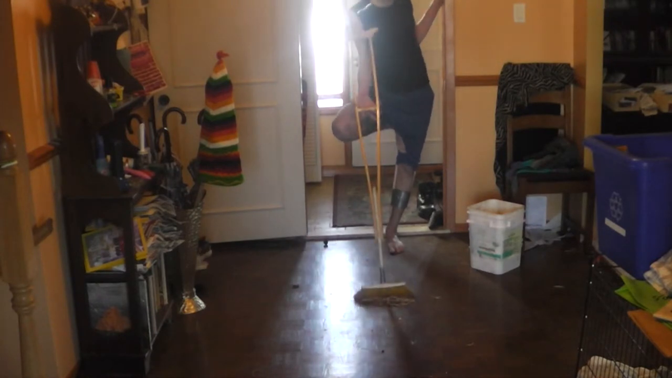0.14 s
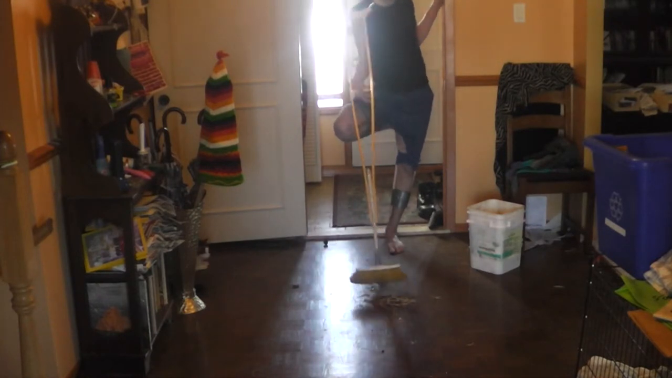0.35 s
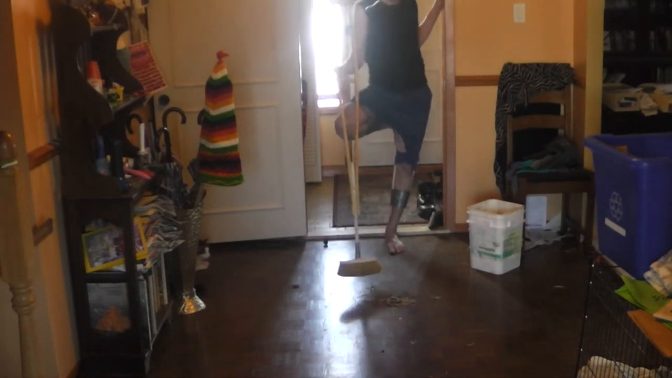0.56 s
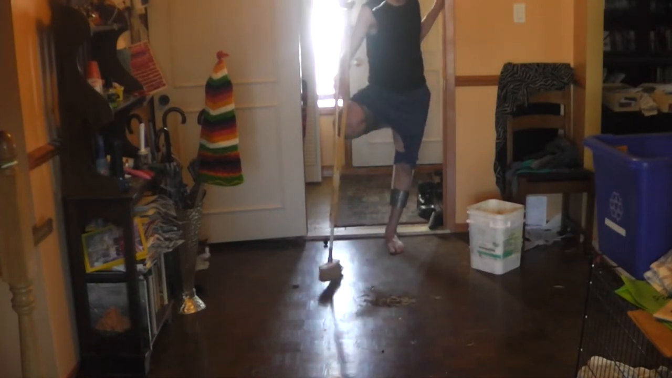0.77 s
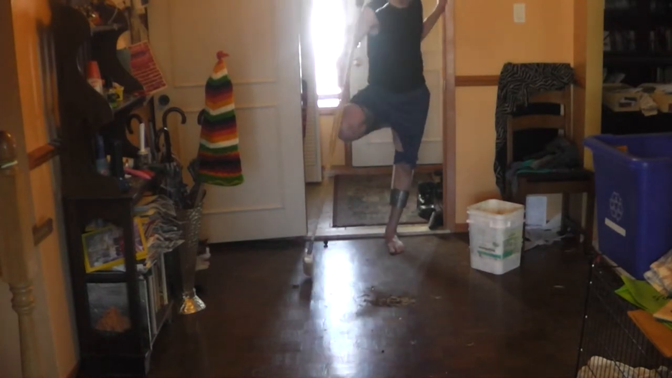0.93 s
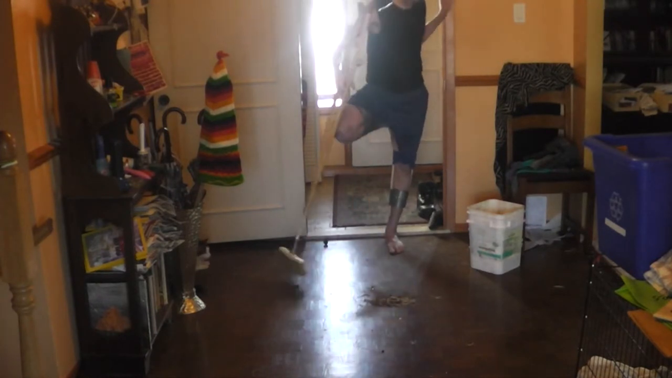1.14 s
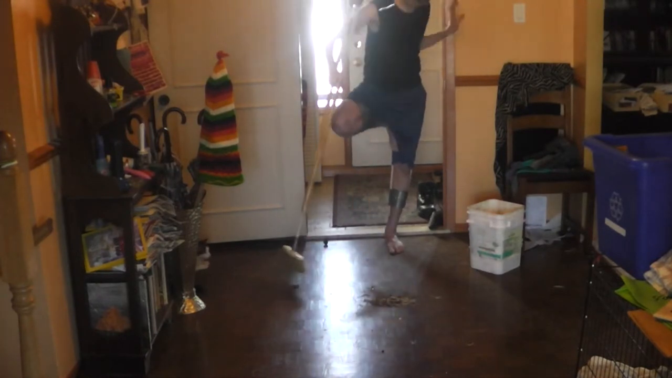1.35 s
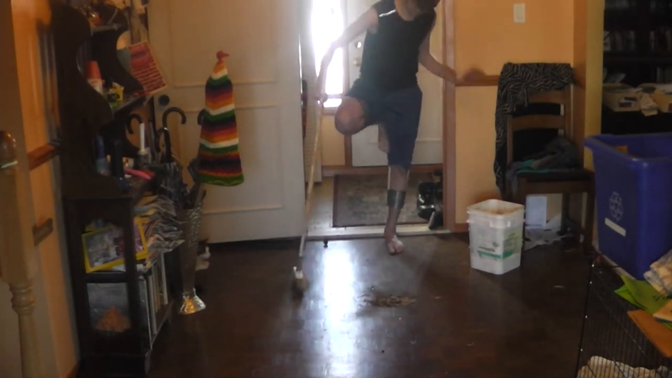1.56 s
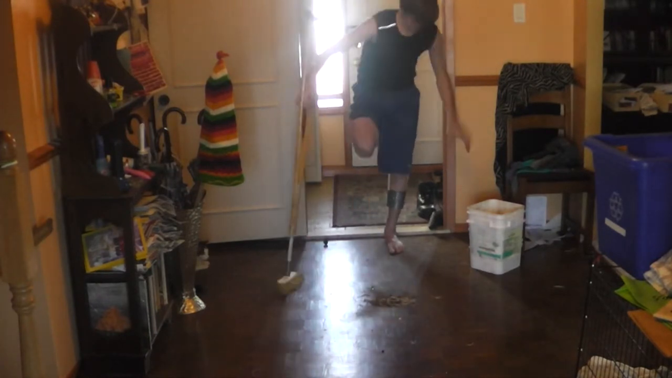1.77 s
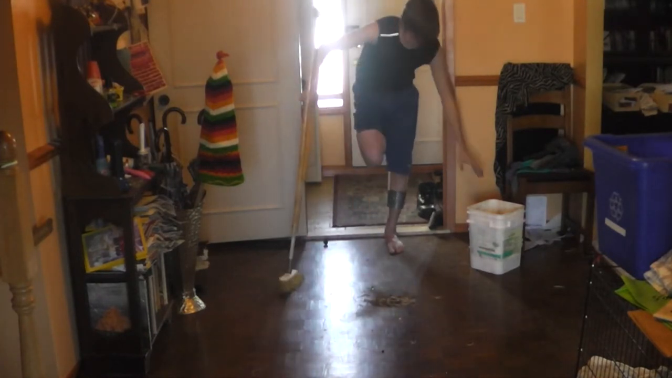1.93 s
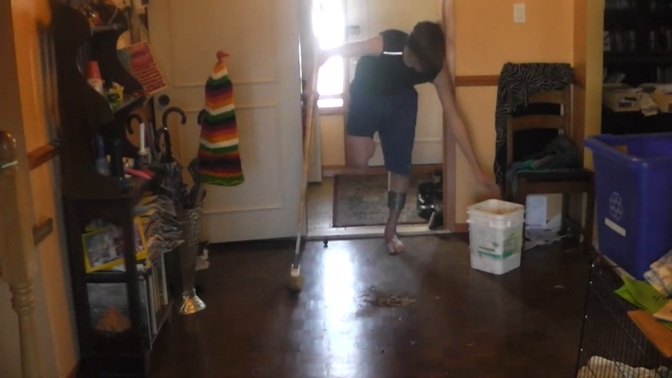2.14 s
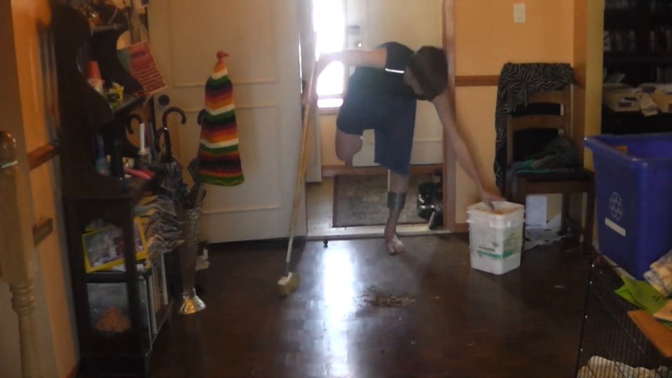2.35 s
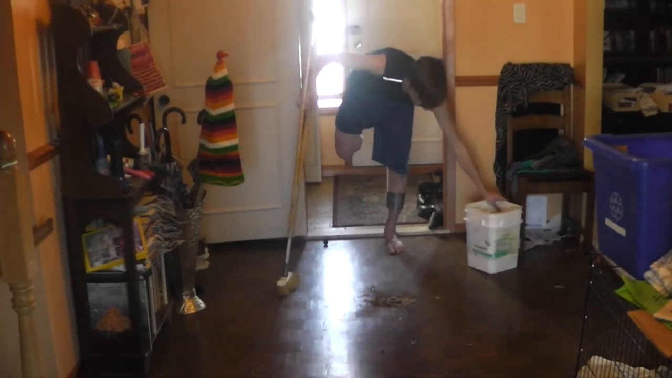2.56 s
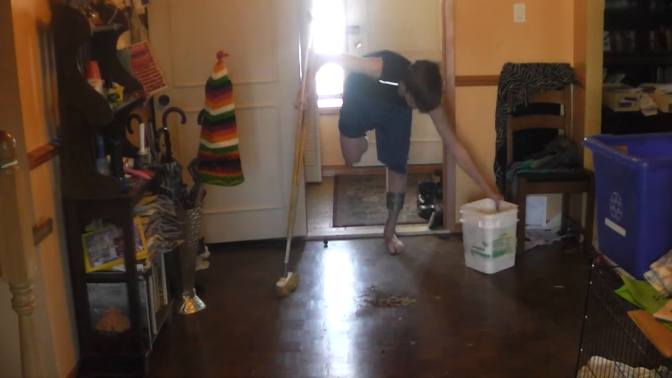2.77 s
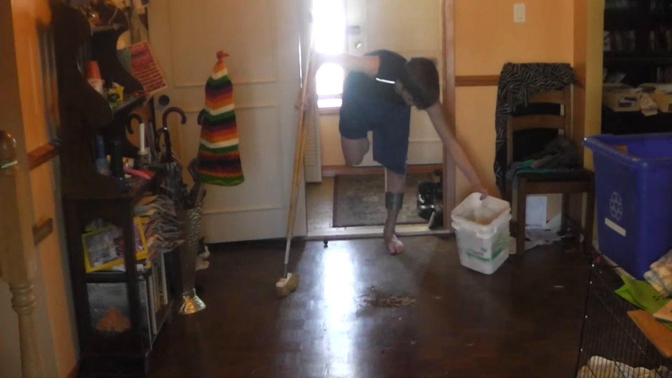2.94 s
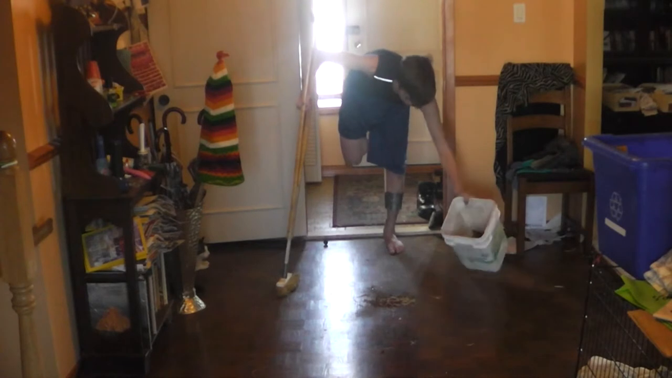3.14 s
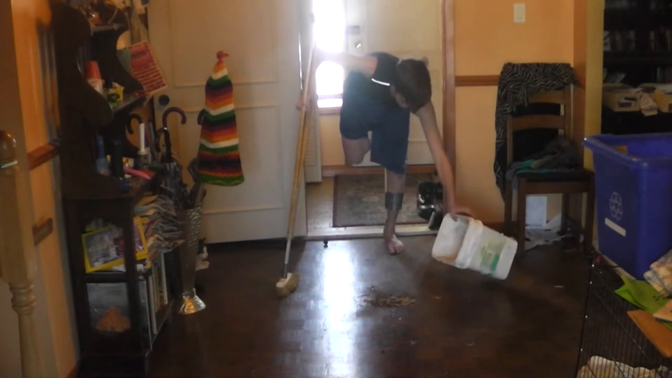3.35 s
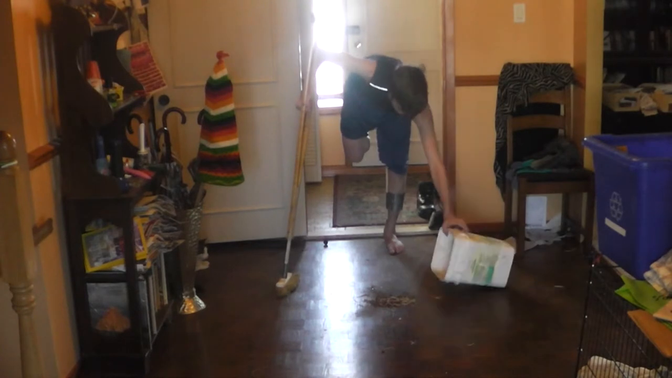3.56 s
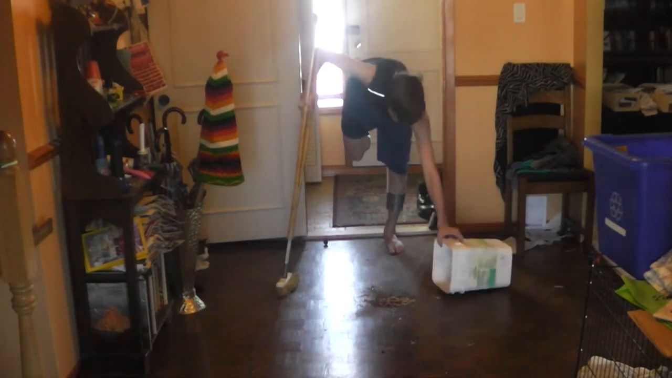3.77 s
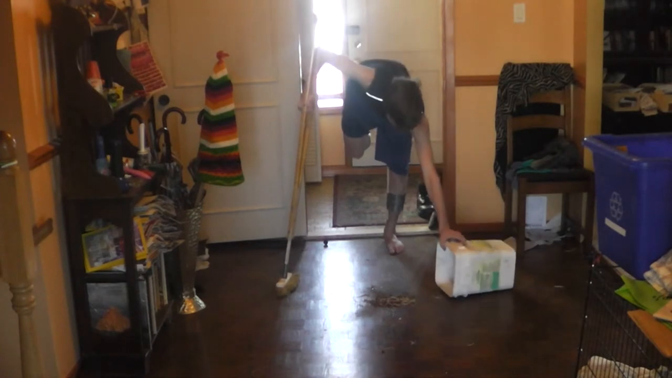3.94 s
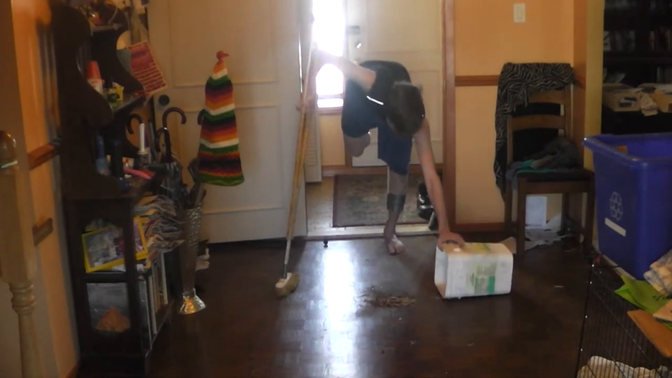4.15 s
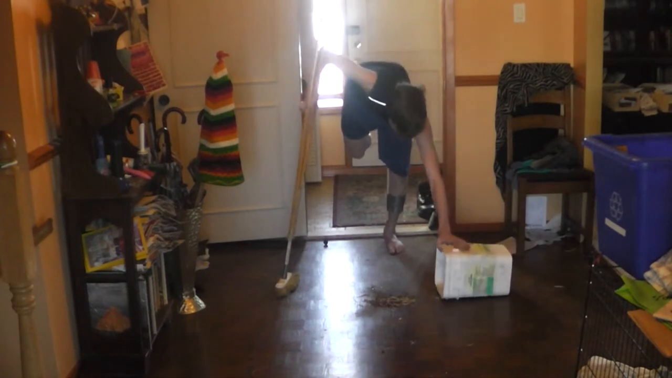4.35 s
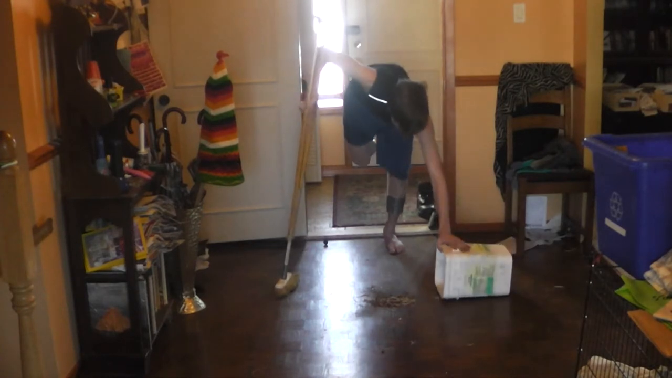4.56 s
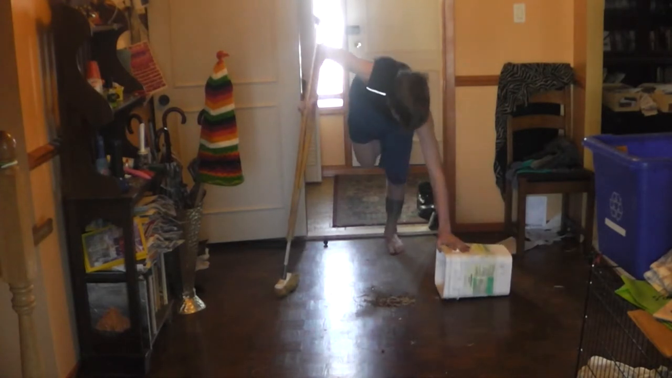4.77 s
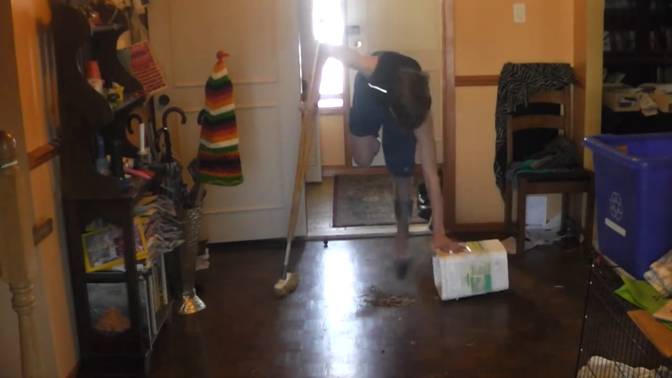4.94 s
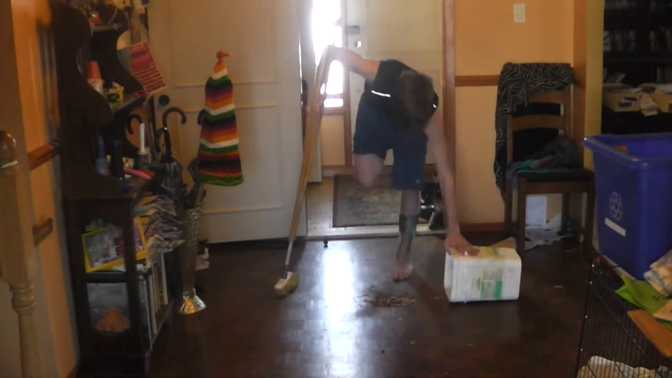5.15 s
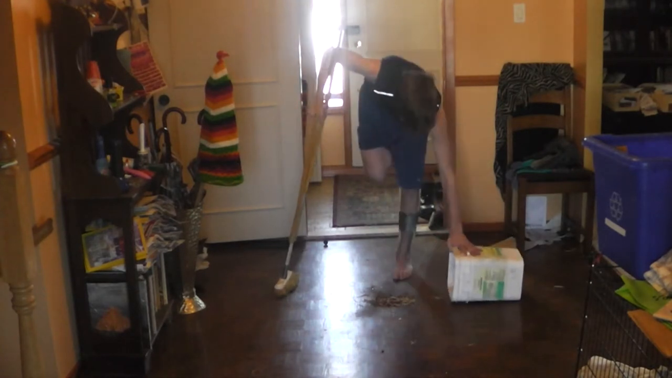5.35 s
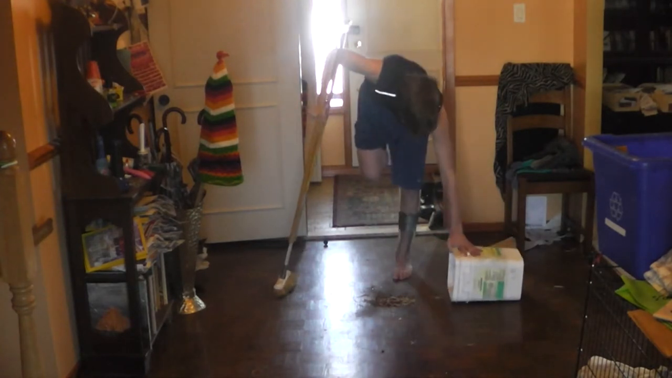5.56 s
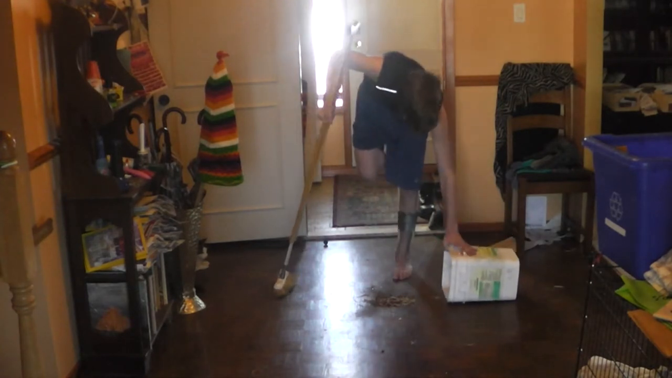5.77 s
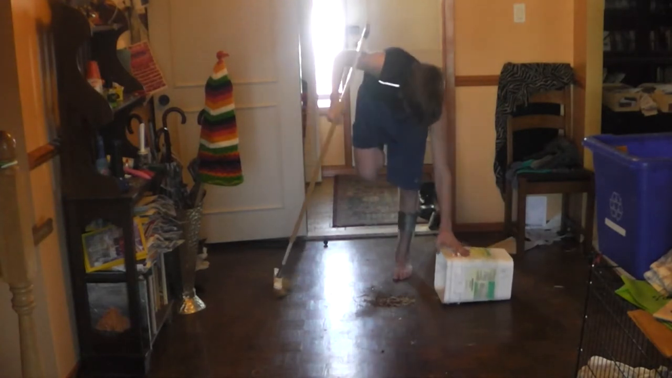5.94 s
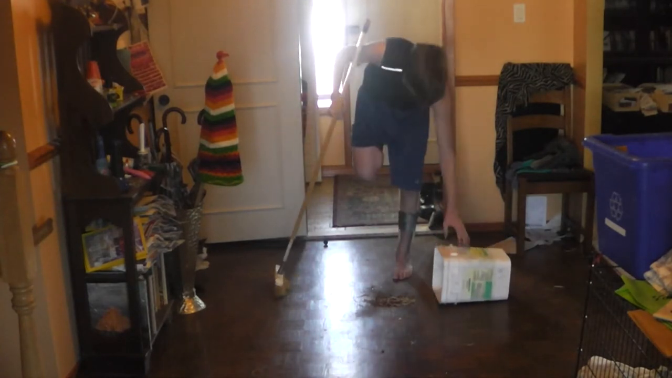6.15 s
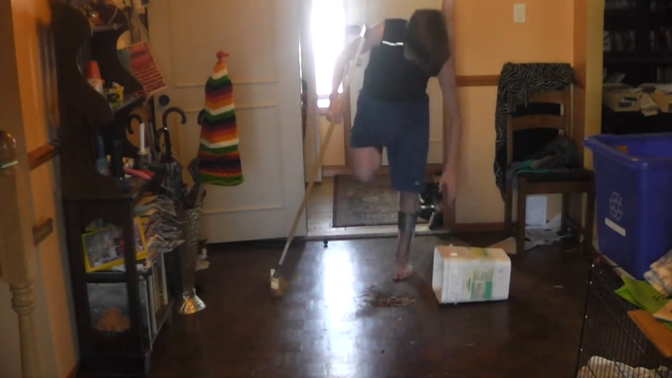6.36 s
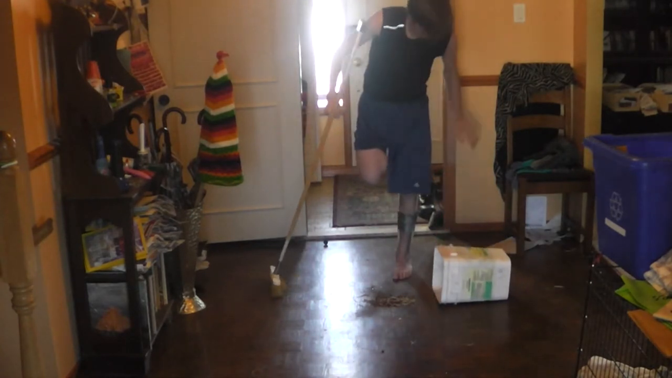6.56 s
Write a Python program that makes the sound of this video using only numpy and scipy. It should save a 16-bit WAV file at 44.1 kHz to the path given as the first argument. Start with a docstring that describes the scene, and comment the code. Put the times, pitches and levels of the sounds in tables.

```python
"""Plastic bucket on a wooden hall floor

A bucket is tipped over, laid down, dragged and dropped into place, and a broom taps: decaying modes plus noise.
Clothes and hands rustle and the bucket's contents rattle with a hiss at the blows (filtered clicks);
faint high pings flutter (modulated tones). An appliance hums (wavering sines) over room noise (filtered noise).
A small stereo microphone hears it from a few metres, with hall reverberation from sparse taps.
"""
import sys
import numpy as np
from scipy import signal
from scipy.fft import rfft, irfft
from scipy.io import wavfile
from scipy.ndimage import uniform_filter1d

SR = 44100
rng = np.random.default_rng(int(sys.argv[2]) if len(sys.argv) > 2 else 0)


def file_out(sig):
    """Save sig as 16-bit WAV at sys.argv[1]."""
    # one column per channel
    cols = np.atleast_2d(sig).T
    # limit, then scale
    lim = np.clip(cols, -1, 1)
    pcm = np.round(lim * 32767).astype(np.int16)
    wavfile.write(sys.argv[1], SR, pcm)


N = 291501

# room noise spectrum: freq_hz, density_db
AIR_SPECTRUM = [(8.8, -42), (15, -12), (64, -4.5), (87, -26), (124, -5.5), (286, -10), (312, -10),
                (350, -12), (589, -14), (643, -15.5), (1490, -28.5), (2160, -42.5), (10300, -43),
                (13000, -50), (15000, -80)]
AIR_DB = -42
# appliance hum partials: freq_hz, rms_db
HUM_PARTIALS = [(59.5, -55.5), (119.6, -43.5), (360, -54)]

# rustles of clothes and hands, and hissing rattle of the bucket's contents at the blows:
# peak_s, rise_s, fall_s, level_db, bright_minus_dull_db
RUSTLES = [(.15, 0.18, 0.072, -51, 5), (.27, 0.033, 0.088, -52, 18), (.51, 0.11, 0.18, -49, 5),
           (.58, 0.054, 0.49, -55.5, 6), (1.18, 0.1, 0.41, -63, 13), (1.6, 0.064, 0.17, -45, 3),
           (2.28, 0.23, 0.43, -45, 3), (2.48, .05, 1, -58.5, -9), (2.82, 0.037, 0.34, -49, 5),
           (2.96, 0.067, 0.16, -51, 0), (3.33, 0.15, 0.33, -35, -1), (3.392, 0.014, 0.16, -36, -10),
           (3.52, 0.091, 0.15, -36.5, -15), (3.7, 0.12, 0.059, -39.5, -4.5), (3.78, 0.027, 0.12, -45, -1),
           (3.92, 0.062, 1, -47.5, -8), (4.1, 0.028, 0.2, -43, -7), (4.34, 0.07, 0.047, -46, 14),
           (4.478, 0.056, 0.067, -54, 0), (4.8, 0.17, 1, -57.5, 4), (5.061, 0.019, 0.1, -22.5, -11),
           (5.15, 0.016, 0.14, -28, -6), (5.22, .05, .4, -45.5, -1), (5.7, 0.2, 0.95, -64, 20),
           (6.018, 0.38, 0.11, -45, -8)]
# spectrum of rustle and rattle: freq_hz, density_db
RUSTLE_SPECTRUM = [(880, -2), (1500, -2.5), (1640, 0), (2400, -18), (2950, -9), (3350, -13), (5800, -8.5),
                   (7200, -14.5), (10400, -10.5), (14300, -20.5), (15600, -42)]
RUSTLE_FLOOR_DB = -68.5  # clothes never rest fully

# faint high pings: start_s, level_db, pitch_hz, t60_s
PINGS = [(1.969, -48, 3750, 0.1), (3.381, -30.5, 10600, 0.11), (4.458, -65, 4600, 0.085),
         (4.635, -50, 9000, 0.09), (4.634, -59, 4450, .14), (4.885, -51, 4640, 0.061),
         (5.149, -22, 9800, 0.048)]

# modes of air and floor of the bucket: freq_hz, level_db, t60_s
HOLLOW_MODES = [(172.6, -5, 0.063), (200, -4, 0.13), (242.3, 1, 0.14), (264.3, -0.5, 0.11), (300.9, 0, .11),
                (350, -6.5, 0.081)]
# modes of the bucket walls: freq_hz, level_db, t60_s
WALL_MODES = [(424, 6, 0.034), (480.4, 3, 0.057), (570.3, -2, 0.098), (621, -5, 0.089), (647, 0.5, 0.047),
              (744.5, -1, 0.076), (795, -1.5, 0.078), (857, -5.5, 0.034)]
# modes of the floor boards, the lowest for the landing only: freq_hz, level_db, t60_s
BOARD_MODES = [(57.7, -1, 0.3), (69, -2, 0.093), (98, 0.5, 0.081), (141, -8, 0.12)]
# modes of the bucket rim: freq_hz, level_db, t60_s
RIM_MODES = [(934.5, 1.5, 0.027), (999, 1.5, 0.033), (1116.5, -1.5, 0.038), (1187, 0, 0.035),
             (1300.6, 1, 0.027), (1416, 4, 0.021), (1514, 0.5, 0.02), (1652, 0, 0.016), (1821, -1.5, 0.023),
             (1928, -2.5, 0.014), (2105, -7, 0.012), (2356, -5, 0.0069)]

# drags over the boards: peak_s, rise_s, fall_s, pressure_db, hardness_db_per_octave
DRAGS = [(1.595, 0.025, 0.23, -44, 1.5), (2.28, 0.21, 0.24, -46.5, -7), (2.705, 0.058, 0.34, -38.5, -3.5),
         (2.832, 0.058, 0.38, -41.5, -7), (3.02, 0.11, 0.26, -48, 4.5), (3.369, 0.25, 0.014, -40.5, 5),
         (3.39, 0.011, 0.11, -45.5, 11.5), (3.57, 0.024, 0.3, -28.5, -0.5), (3.69, 0.17, 0.18, -25, 1.5),
         (3.917, 0.053, 0.18, -25.5, 1), (4.09, 0.078, 0.31, -43, 7), (4.33, 0.053, 0.2, -49, 3),
         (4.934, 0.061, .06, -43, 1), (5.0, 0.058, 0.036, -29.5, -1.5), (5.102, 0.023, 0.073, -17, 1.5),
         (5.139, 0.042, 0.2, -15, 1.5), (5.368, 0.13, 0.18, -48.5, 9.5), (5.828, 0.087, 0.65, -30, -1),
         (5.95, 0.14, 0.05, -49, -17), (6.05, 0.051, 0.32, -66, 8)]
# drag level at hardness 0: hollow_db, wall_db, low_rim_db, high_rim_db
DRAG_PARTS_DB = (-2, -6, -6.5, -13)
# octaves that multiply drag hardness: hollow_oct, wall_oct, low_rim_oct, high_rim_oct
DRAG_OCTAVES = (0, 1.3, 2.2, 3)

# blows of bucket and broom: start_s, level_db, hardness_db_per_octave, tick_db
BLOWS = [(0.508, -43, 2.5, -44), (1.579, -41, 7.5, -41), (2.715, -29.5, -7.5, -60), (2.799, -35.5, 0, -51),
         (3.248, -26, 0, -44), (3.345, -38.5, 9, -47), (3.381, -35, 11.5, -23.5), (3.402, -41.5, 12, -36),
         (3.497, -8, -2.5, -32), (3.507, -14.5, 0, -43), (3.521, -9, -5.5, -36), (3.544, -12.5, -8.5, -46),
         (3.611, -17.5, 1, -45), (3.642, -19, 4, -44), (3.672, -14, 2.5, -37.5), (3.768, -31, 6, -42),
         (3.883, -20.5, 2, -51), (3.903, -23, 5, -55), (3.924, -17.5, 1.5, -41), (3.96, -17, -2.5, -58),
         (4.056, -31.5, 7, -52), (4.09, -31, 8, -40), (4.316, -45, 9.5, -59), (4.729, -52, 6, -47.5),
         (4.925, -29, 0, -47.5), (4.982, -26.5, 2, -60), (5.054, -4.5, 2.5, -22.5), (5.065, -6, 3, -37),
         (5.078, -5, 3, -34), (5.091, -19, 5, -37), (5.134, -1, 1.5, -50), (5.148, -8, 1.5, -40),
         (5.166, -13, 2.5, -50), (5.184, -10.5, -10, -33), (5.228, -11, -2, -50), (5.272, -15.5, -2.5, -51),
         (5.355, -37, 10, -52), (5.82, -28.5, 4.5, -59), (5.859, -32, 5.5, -48), (5.89, -24, 2, -44),
         (5.924, -28.5, -4, -49)]
# blow level at hardness 0: hollow_db, wall_db, boards_db, rim_db
BLOW_PARTS_DB = (1, -3, -14.5, -11)
# octaves that multiply blow hardness: hollow_oct, wall_oct, boards_oct, rim_oct
BLOW_OCTAVES = (-0.5, 1.73, 1.5, 3)
HARD_WITHIN = 0.52  # share of positive hardness that tilts the modes inside one part
# contact tick spectrum: freq_hz, density_db
TICK_SPECTRUM = [(1470, -10), (2500, -1), (3190, -42), (3720, 2), (6220, -4), (7140, -6), (8330, -7),
                 (9710, 0), (14300, -8.5), (15600, -17)]
# soft landing of the bucket's side before the loudest blow: start_s, hollow_db, boards_db
LANDING = (5.038, -11, -7)

# hall decay: freq_hz, t60_s
HALL_DECAY = [(60, 0.24), (200, 0.15), (600, 0.4), (1500, 0.3), (4000, 0.42), (9000, 0.2), (15000, 0.57)]
# tone of the hall in the mid channel: freq_hz, gain_db
HALL_TONE = [(60, -3), (300, -1.5), (900, -2), (2000, -2.5)]
HALL_DB = -4.5
# filter of the side channel: freq_hz, gain_db
SIDE_TONE = [(60, -7.5), (100, -14.5), (180, -17.5), (310, -16), (550, -15), (950, -11.5), (1650, -5),
             (2860, -14), (4970, -1), (8640, -5.5), (15000, 8)]

# port sensitivity: freq_hz, left_minus_right_db
PORT_LEAN = [(60, 0.8), (180, 0.5), (550, 0.5), (1650, 0), (4970, 0), (15000, -2.5)]
# microphone bass cut and housing dip: freq_hz, gain_db
MIC_TONE = [(25, -10), (45, -3.5), (2300, 0), (2800, -6), (3400, -6.5), (3800, -1.5)]
CEILING, EDGE_HZ = 1.3, 15600  # saturation level, band limit


def gain_of(db):
    """Decibels to an amplitude factor."""
    return 10 ** (np.asarray(db) / 20)


def evened(x):
    """Scales to rms 1."""
    return x / np.sqrt(np.mean(x ** 2) + 1e-20)


def read(points, hz):
    """Interpolates a curve on a log-frequency axis."""
    f, value = np.transpose(points)
    return np.interp(np.log(hz + 1), np.log(f + 1), value)


def colour(x, points):
    """Filters by a gain curve in dB, zero phase."""
    count = x.shape[-1]
    gain = gain_of(read(points, np.fft.rfftfreq(count, 1 / SR)))
    return irfft(rfft(x) * gain, count)


def add(mix, start_s, sound):
    """Mixes a sound in at start_s."""
    part = mix[round(start_s * SR):][:len(sound)]
    part += sound[:len(part)]


def swell(peak_s, rise_s, fall_s):
    """Climbs 20 dB per rise_s to the peak, drops 20 dB per fall_s after it; one value per 32 samples."""
    t = np.arange(0, N + 32, 32) / SR - peak_s
    db = -20 * np.maximum(-t / max(rise_s, .003), t / max(fall_s, .003))
    return gain_of(db)


def fine(coarse):
    """Stretches a 32-sample-step envelope to full rate."""
    return np.interp(np.arange(N), 32 * np.arange(len(coarse)), coarse)


def grains(per_s, spread_db):
    """Sparse clicks of random time, sign and size, rms 1."""
    size_db = spread_db * np.minimum(rng.exponential(1, N), 4)
    size = gain_of(size_db) * rng.choice([-1., 1.], N)
    return evened(size * (rng.random(N) < per_s / SR))


def ring(modes, rise_s, uneven_db=0):
    """Sum of decaying sine modes with a soft onset set by contact time, peak 1."""
    t = np.arange(SR // 4) / SR
    hz, db, t60_s = np.transpose(modes)[:, :, None]
    decay = gain_of(db + uneven_db - 60 * t / np.maximum(t60_s, .005))
    y = (decay * np.sin(2 * np.pi * hz * t)).sum(0)
    y = y * (1 - np.exp(-(t / rise_s) ** 2))
    return y / abs(y).max()


def room_noise():
    """Filtered noise with slowly drifting spectral patches, independent in mid and side."""
    frames, hz = N // 512 + 5, np.fft.rfftfreq(2048, 1 / SR)
    a, b, c, d, patches = rng.standard_normal((frames, 1025, 5)).T
    patches = uniform_filter1d(patches, size=12, axis=0)
    patches = evened(uniform_filter1d(patches, size=6, axis=1))
    gain = gain_of(read(AIR_SPECTRUM, hz)[:, None] + 0.58 * patches)
    spectra = np.array([a + 1j * b, c + 1j * d]) * gain
    noise = signal.istft(spectra, nperseg=2048, noverlap=1536)[1][:, :N]
    return gain_of(AIR_DB) * evened(noise)


def hum():
    """Motor partials as sines of random phase, each wavering slightly in level."""
    t = np.arange(N) / SR
    wavers = [evened(uniform_filter1d(rng.standard_normal(N), size=3000)) for _ in HUM_PARTIALS]
    out = np.zeros(N)
    for (hz, db), waver in zip(HUM_PARTIALS, wavers):
        tone = np.sqrt(2) * np.sin(2 * np.pi * (hz * t + rng.random()))
        out += gain_of(db + 0.37 * waver) * tone
    return out


def rustle_and_rattle():
    """Rustle and hissing rattle as dense fine clicks, dull and bright bands balanced per swell."""
    swells = np.array([swell(*row[:3]) for row in RUSTLES])
    db, bright_db = np.transpose(RUSTLES)[3:]
    crackle = evened(colour(grains(per_s=5000, spread_db=2.5), RUSTLE_SPECTRUM))
    lowpass = signal.butter(2, 7500, fs=SR, output="sos")
    dull = signal.sosfiltfilt(lowpass, crackle)
    floor = gain_of(RUSTLE_FLOOR_DB)
    dull_level = fine(gain_of(db - bright_db / 2) @ swells + floor)
    bright_level = fine(gain_of(db + bright_db / 2) @ swells + floor)
    return dull * dull_level + (crackle - dull) * bright_level


def pings():
    """Short fuzzy pings: decaying tones modulated by smoothed noise in quadrature."""
    out, t = np.zeros(N), np.arange(SR // 5) / SR
    flutter = uniform_filter1d(rng.standard_normal((len(PINGS), 2, len(t))), size=120, axis=2)
    for (start_s, db, hz, t60_s), (a, b) in zip(PINGS, flutter):
        phase = 2 * np.pi * hz * t
        tone = evened(a * np.sin(phase) + b * np.cos(phase))
        envelope = gain_of(db - 60 * t / t60_s) * (1 - np.exp(-t / 0.0023))
        add(out, start_s, envelope * tone)
    return out


def drags():
    """Friction on the boards as random slip impulses that excite hollow, wall and rim modes."""
    slips = grains(per_s=3000, spread_db=2.5)
    strokes = np.array([swell(*row[:3]) for row in DRAGS])
    press_db, hardness = np.transpose(DRAGS)[3:]
    parts = (HOLLOW_MODES, WALL_MODES, RIM_MODES[:5], RIM_MODES[5:])
    out = np.zeros(N)
    for modes, part_db, octaves in zip(parts, DRAG_PARTS_DB, DRAG_OCTAVES):
        press = fine(gain_of(press_db + part_db + hardness * octaves) @ strokes)
        body = ring(modes, rise_s=0.00071)
        out += signal.oaconvolve(press * slips, body / np.linalg.norm(body))[:N]
    return out


def blows():
    """Impacts ring hollow, wall, boards and rim, hardness tilting their levels, plus a noise tick."""
    out, tick_level = np.zeros(N), np.zeros(N)
    t = np.arange(1500) / SR
    # each blow weights the modes differently, in dB
    spots_db = 1.5 * rng.standard_normal((len(BLOWS), 4, 12, 1))
    # modes, rise_s
    parts = ((HOLLOW_MODES, .003), (WALL_MODES, .001), (BOARD_MODES[1:], .005), (RIM_MODES, .0007))
    for (start_s, db, hardness, tick_db), spot_db in zip(BLOWS, spots_db):
        levels_db = db + np.array(BLOW_PARTS_DB) + hardness * np.array(BLOW_OCTAVES)
        for part_db, (modes, rise_s), uneven_db in zip(levels_db, parts, spot_db):
            octaves = np.log2(np.array(modes)[:, :1])
            tilt_db = HARD_WITHIN * max(hardness, 0) * octaves
            body = ring(modes, rise_s, uneven_db[:len(modes)] + tilt_db)
            add(out, start_s, gain_of(part_db) * body)
        add(tick_level, start_s, gain_of(tick_db) * np.exp(-t / 0.0061))
    start_s, hollow_db, boards_db = LANDING
    hollow = gain_of(hollow_db) * ring(HOLLOW_MODES[:2], rise_s=0.02)
    thud = gain_of(boards_db) * ring(BOARD_MODES[:1], rise_s=0.016)
    add(out, start_s, hollow + thud)
    return out + tick_level * evened(colour(rng.standard_normal(N), TICK_SPECTRUM))


def hall(x):
    """Sparse-tap reverberation with decay per band; three mid/side tail pairs alternate steadily."""
    taps = np.zeros((3, 2, SR))
    at = np.arange(200, SR - 20, 20) + rng.integers(0, 20, (3, 2, (SR - 201) // 20))
    np.put_along_axis(taps, at, rng.choice([-1., 1.], at.shape), 2)
    hz, t, z = signal.stft(taps, SR, nperseg=512)
    t60_s = np.maximum(read(HALL_DECAY, hz), .05)[:, None]
    decay = gain_of(-60 * t / t60_s) / np.sqrt(t60_s)
    tails = signal.istft(z * decay, SR, nperseg=512)[1]
    # three shifted cosines whose squares sum to one
    phase = np.pi * (7 * np.arange(N) / SR + np.arange(3)[:, None] / 3)
    turns = np.sqrt(2 / 3) * np.cos(phase)
    fed = (x * turns)[:, None]
    return signal.fftconvolve(fed, tails / np.linalg.norm(tails[0, 0]), axes=2)[..., :N].sum(0)


def scene():
    """Sums direct sound, hall and background as mid and side, decoded to two ports."""
    near = blows() + pings() + drags() + rustle_and_rattle()
    wet, air = hall(near), room_noise()
    mid = near + gain_of(HALL_DB) * colour(wet[0], HALL_TONE) + air[0] + hum()
    side = colour(0.33 * wet[1] + air[1], SIDE_TONE)
    return np.array([mid + side, mid - side])


def record(dry):
    """Port sensitivity, microphone colour, soft saturation, then the band limit."""
    left_tone = [(hz, db / 2) for hz, db in PORT_LEAN]
    right_tone = [(hz, -db / 2) for hz, db in PORT_LEAN]
    ports = np.array([colour(dry[0], left_tone), colour(dry[1], right_tone)])
    saturated = CEILING * np.tanh(colour(ports, MIC_TONE) / CEILING)
    lowpass = signal.firwin(511, EDGE_HZ, window=("kaiser", 9), fs=SR)
    return signal.oaconvolve(saturated, lowpass[None], "same")


dry = scene()
out = record(dry)
file_out(out)
```